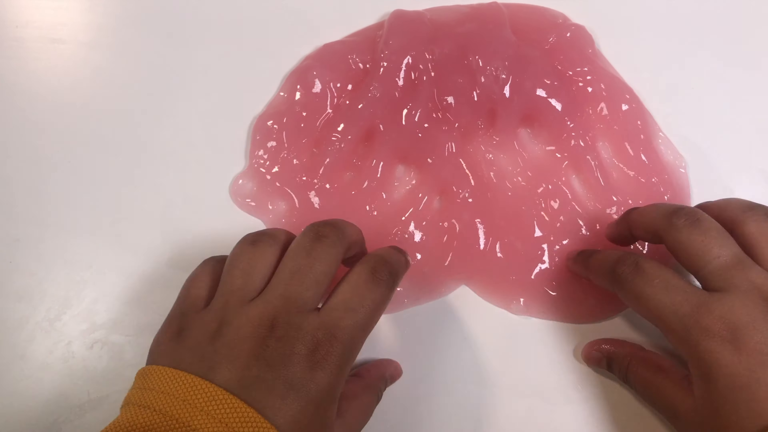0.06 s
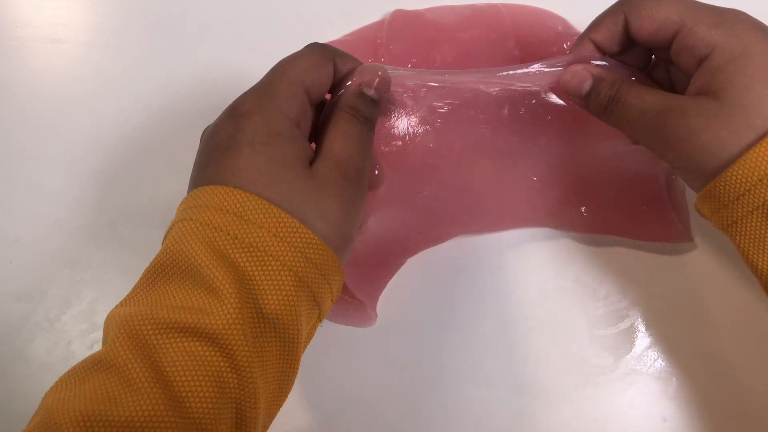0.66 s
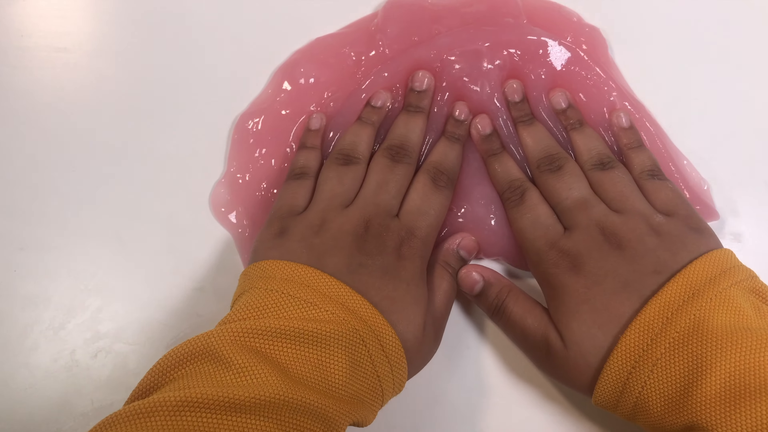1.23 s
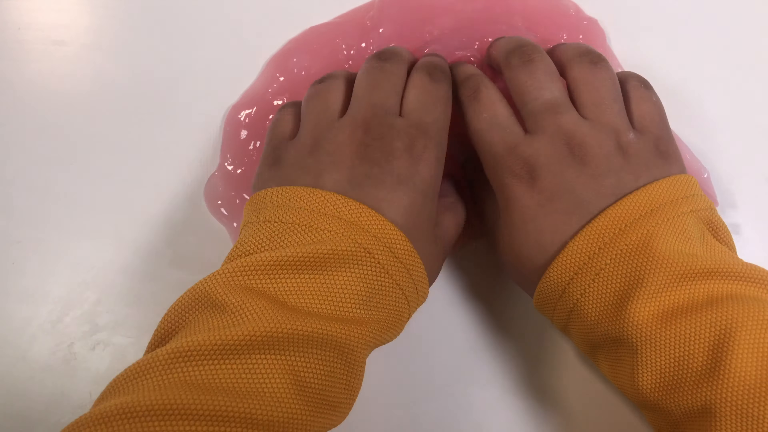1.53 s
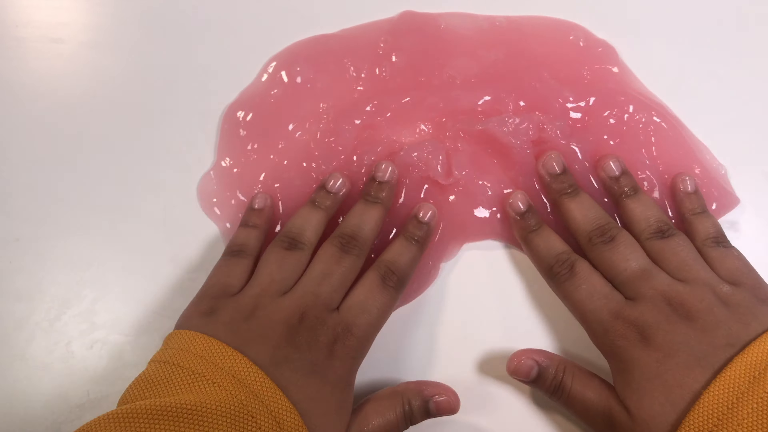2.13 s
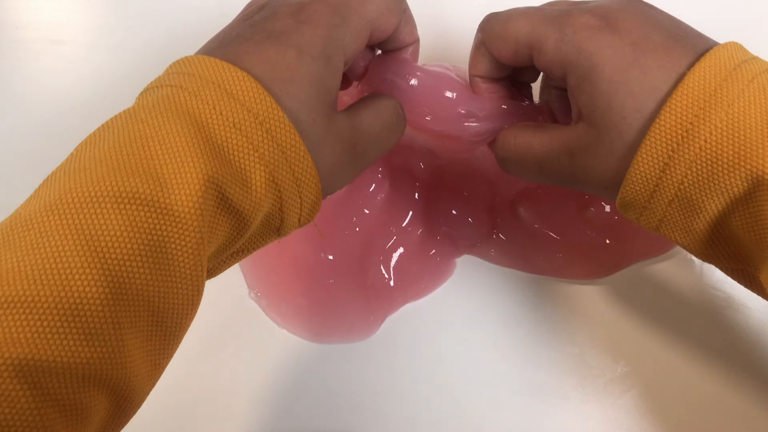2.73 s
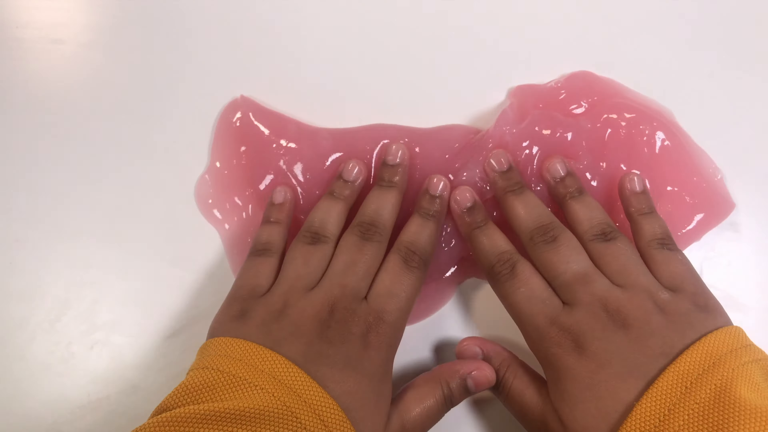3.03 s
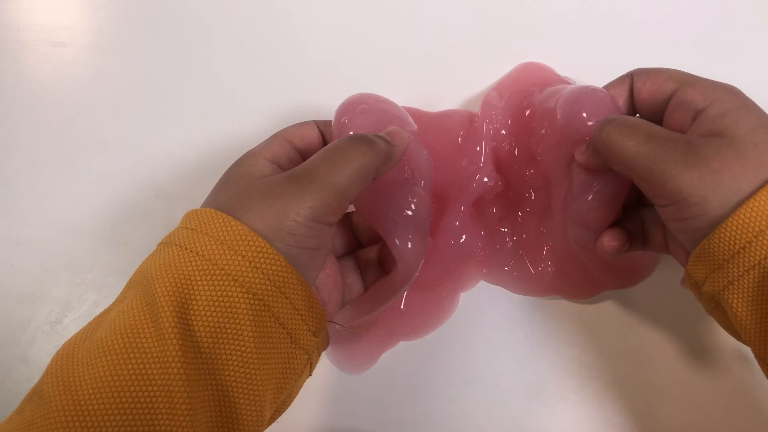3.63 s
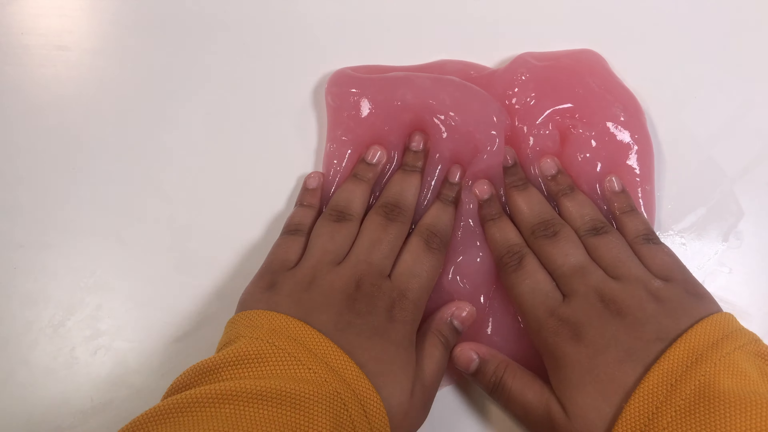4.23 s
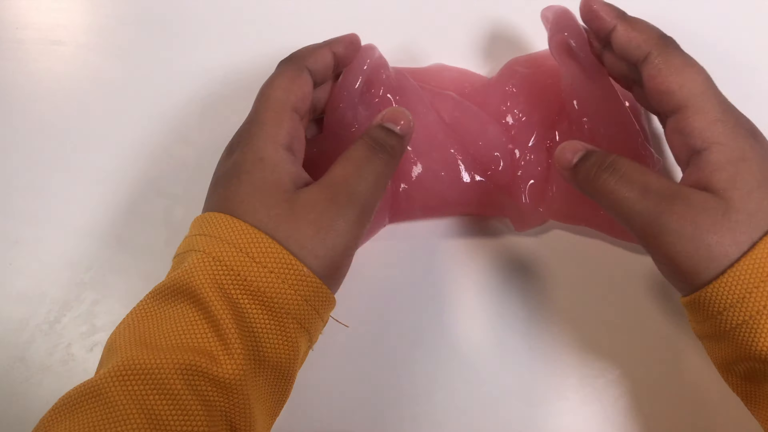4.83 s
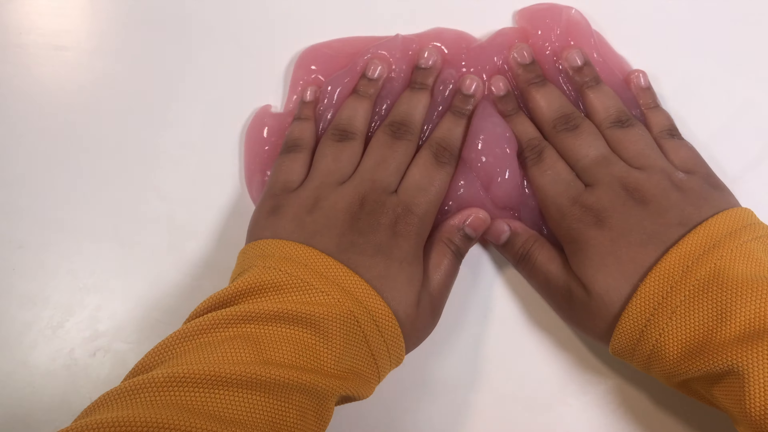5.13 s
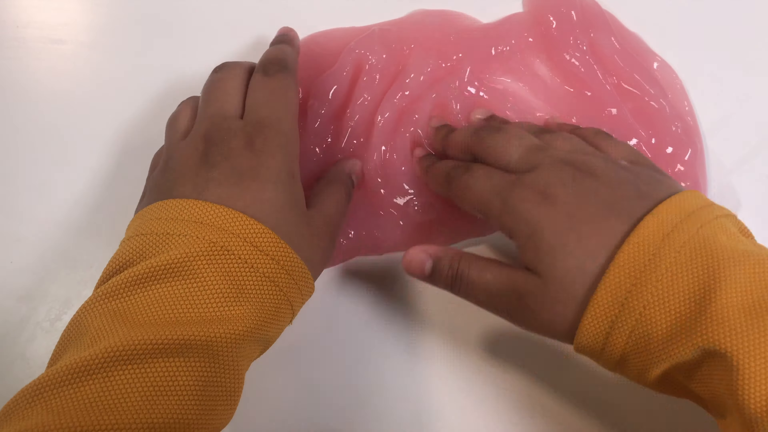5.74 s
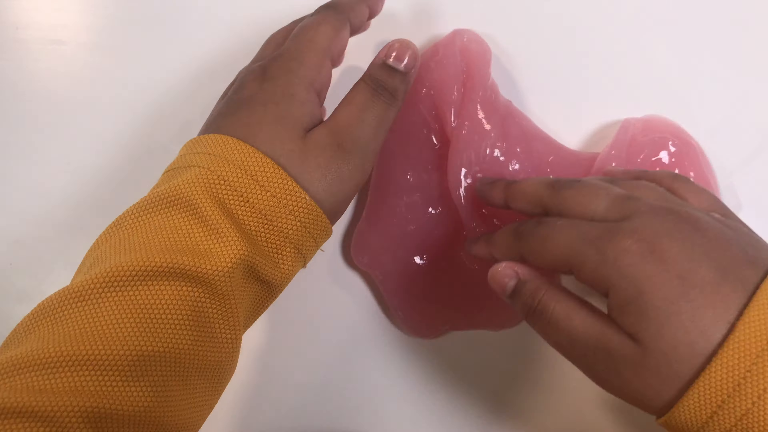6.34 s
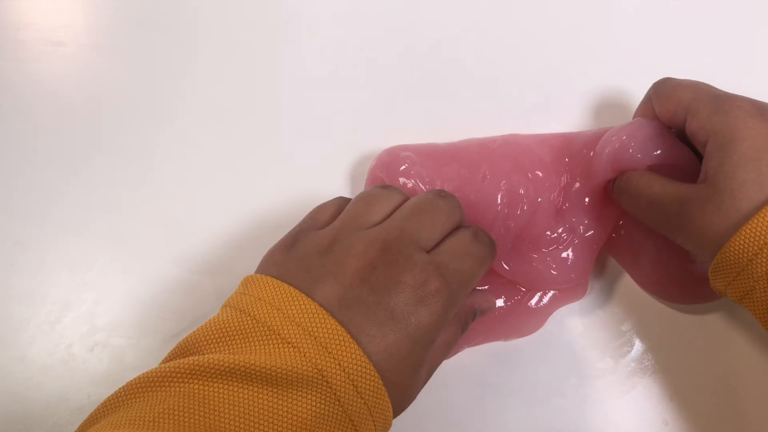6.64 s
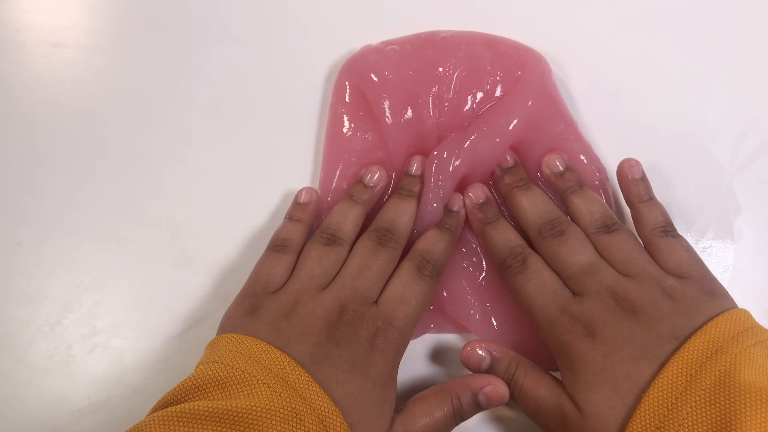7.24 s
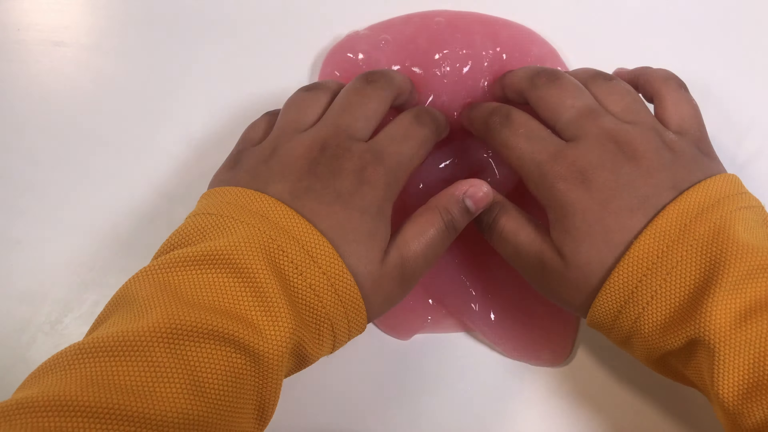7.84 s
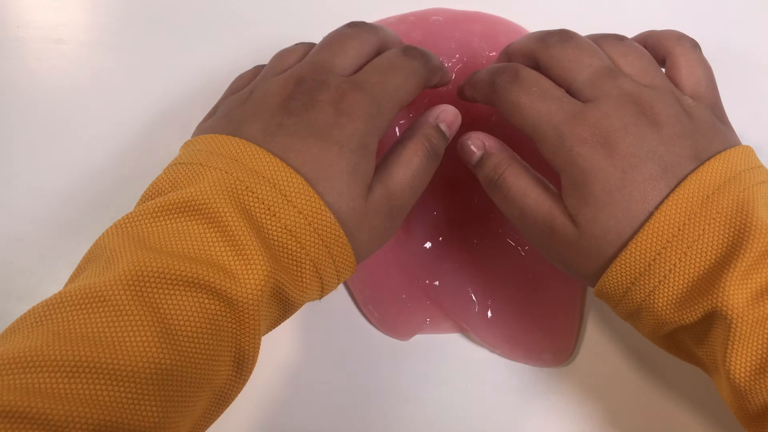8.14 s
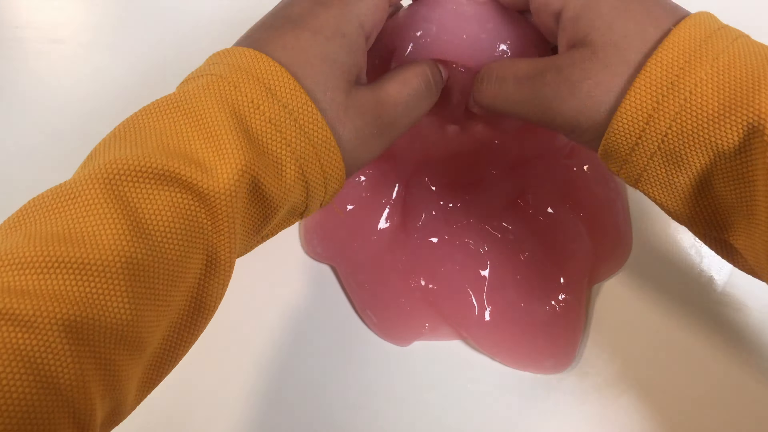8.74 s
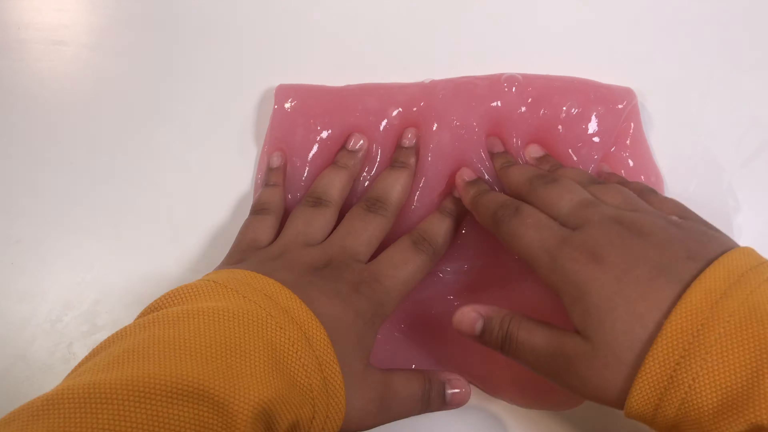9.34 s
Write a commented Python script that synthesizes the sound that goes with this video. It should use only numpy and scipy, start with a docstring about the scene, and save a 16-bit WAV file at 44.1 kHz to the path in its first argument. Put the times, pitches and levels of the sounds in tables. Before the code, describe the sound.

Two hands knead sticky slime on a table, close to the microphone in a small, quiet room; everything sounds slightly hollow. A soft pop and plop come at 0.2 seconds. From about 0.9 seconds the palms press, bringing faint rubbing, fizz, sticky crackle and small bubble ticks, with light pops until 2.2 seconds. Each big air pocket bursts with a quick double pop, a snap and a gulp, leaving a soft low thump. A loud one lands at 2.7 seconds, followed by more pops and stronger squelching around 3.3 to 4.3 seconds. Faint, brief squeaks and soft plops appear here and there, and some pops ring briefly. Another loud pop comes at 5.1 seconds. From 5.7 seconds, sharp pops recur roughly every third to half second, each with a short crackle; the loudest, near 8 seconds, distorts slightly. The sound stops at about 9.3 seconds.

```python
"""A small room, where two hands knead sticky slime on a table, close to a microphone.
Each big air pocket is gripped, bursts twice with a pop, a snap and a gulp, and leaves a soft low thump:
the tearing film excites the cavity, and the slab lands on the table. Small bubbles tick, open cavities
ring, soft pockets plop and creases squeak. Under the palms the slime rubs, squelches, fizzes and crackles
as it peels off the skin. Interference makes it all hollow, and the loudest pops overload the recorder."""
import sys
import numpy as np
from scipy import signal
from scipy.fft import rfft, irfft, next_fast_len
from scipy.io import wavfile
from scipy.ndimage import uniform_filter1d

SR = 44100
rng = np.random.default_rng(int(sys.argv[2]) if len(sys.argv) > 2 else 0)


def to_wav(s):
    """Save 16-bit WAV."""
    ch = np.atleast_2d(s).T  # columns
    pcm = np.round(np.clip(ch, -1, 1) * 32767)  # PCM
    wavfile.write(sys.argv[1], SR, pcm.astype(np.int16))


N = 418068

# Resonances of the pops and the crackle. Each row: frequency in Hz, bandwidth in Hz, gain in dB.
POP_MODES = [(1650, 130, -4), (1960, 170, 0), (2330, 160, -5), (3470, 230, -2), (4550, 130, -6),
             (5200, 380, -5), (7470, 190, -7), (9560, 190, -3), (11500, 900, -6)]
# Hollow resonances of the gulps. Each row: frequency in Hz, bandwidth in Hz, gain in dB.
GULP_MODES = [(298, 6.7, -4), (379.2, 38, 6.5), (443.5, 68, 2), (569, 74, 2), (653, 27, 0), (872, 33, -4)]
# Low resonances of table and room. Each row: frequency in Hz, bandwidth in Hz, gain in dB.
TABLE_MODES = [(98, 16, 6), (148, 14, 3), (173, 22, 2)]
# Big air pockets, which burst again as they collapse. Each row: start in seconds, gap to the second burst
# in seconds, pop level in dB, pop pitch in Hz, snap level in dB, gulp level in dB, second burst against
# the first in dB, thump level in dB. Levels in all tables are relative.
BIG_POCKETS = [(0.208, 0.029, -17.5, 1960, -15, -28, 2.5, -26.5),
               (0.9325, 0.0046, -20.5, 1590, -19, -20, -3.5, -21.5),
               (1.3085, 0.0059, -23.5, 2300, -31, -22, -7, -20.5),
               (1.6141, 0.004, -23.5, 2100, -26, -26.5, -7, -18.5),
               (1.7659, 0.034, -16.5, 2440, -19, -19.5, -1.5, -14),
               (2.1928, 0.005, -21.5, 1600, -25, -20.5, -12, -25.5),
               (2.72, 0.016, -5, 3250, -15, -10.5, -10.5, -7.5),
               (3.334, 0.0061, -12, 1680, -12.5, -13.5, -7, -18),
               (3.593, 0.0037, -13, 2600, -22, -24.5, 2.5, -12),
               (3.805, 0.0025, -23, 2470, -22, -24.5, -3, -10),
               (4.255, 0.0028, -17.5, 1310, -31.5, -16.5, -13, -33),
               (4.3343, 0.0037, -17.5, 5000, -23, -30.5, -27, -19.5),
               (4.717, 0.018, -22.5, 3050, -29.5, -26.5, 12.5, -10.5),
               (5.087, 0.025, -2, 2570, -11, -14.5, 5.5, -13.5),
               (5.137, 0.018, -17.5, 3500, -8.5, -36, 0, -36),
               (5.666, 0.0058, -10, 1520, -16.5, -6.5, -13, -15.5),
               (5.963, 0.013, -12.5, 2090, -7, -13.5, -2, -12.5),
               (6.4129, .025, -6, 2190, -4.5, -14, -7, -14), (6.871, 0.026, -14, 2430, -9.5, -14, -8, -17),
               (7.349, 0.023, -7, 3100, -3.5, -15, -8.5, -14.5),
               (7.6935, 0.014, -6, 2420, -12.5, -12, 3, -11.5), (8.0304, 0.022, 0.5, 3150, 3, -8, -9.5, -7),
               (8.3863, 0.02, -5, 3160, -12.5, -15.5, 4, -9), (8.7427, 0.023, -5, 2420, -5, -19, 0.5, -12),
               (9.09, 0.023, -11, 2620, -8.5, -24, 6, -14.5)]

ATTACK_S, RELEASE_S = 0.029, 0.02  # attack of a press; release of any push
CONTACT_S = .84  # the sheet of slime is laid down and the kneading begins
RIP_DB = -37  # below this tack the rips die out and leave a smooth rub
TOP_HZ = 15700


def undb(db):
    """Amplitude ratio of a level in decibels."""
    return 10 ** (np.asarray(db) / 20)


def unit(x):
    """Normalisation to an rms of 1."""
    return x / np.sqrt(np.mean(x ** 2) + 1e-18)


def add(out, s, x):
    """Superposition: x joins out from s seconds on."""
    i = max(0, int(s * SR))
    out[i:i + len(x)] += x[:len(out) - i]


def band(x, lo_hz, hi_hz, order=2):
    """Causal Butterworth band-pass filtering."""
    sos = signal.butter(order, [lo_hz, min(hi_hz, .48 * SR)], "band", fs=SR, output="sos")
    return signal.sosfilt(sos, x)


def resonance(f, hz, width):
    """Frequency response of a damped oscillator, with gain 1 at its centre."""
    return 1j * f * width / (hz ** 2 - f ** 2 + 1j * f * width)


def colour(x, modes, direct_db):
    """Modal filtering: parallel resonances add to a direct path."""
    size = next_fast_len(x.shape[-1])
    f = np.arange(size // 2 + 1) * SR / size
    response = undb(direct_db) + sum(undb(db) * resonance(f, hz, width) for hz, width, db in modes)
    return irfft(rfft(x, size) * response, size)[..., :x.shape[-1]]


def disperse(x, lag_s):
    """Dispersion: the lows come last, so a burst falls in pitch; lag_s is the delay near 500 Hz."""
    f = np.fft.rfftfreq(x.shape[-1], 1 / SR)
    turns = lag_s * 500 * np.log(1 + f / 40)
    return irfft(rfft(x) * np.exp(-2j * np.pi * turns), x.shape[-1])


def swell(db, step_s):
    """Random amplitude modulation: the gain wanders by about db, to a new level every step_s."""
    knots = np.arange(0, N / SR + 1, step_s)
    levels = np.clip(rng.standard_normal(N)[:len(knots)], -2, 1)
    return undb(db * np.interp(np.arange(N) / SR, knots, levels))


def clicks(rate, spread_db):
    """A Poisson process of ruptures, mostly small and a few large."""
    sizes = undb(spread_db * np.minimum(rng.exponential(size=N), 3))
    return (rng.random(N) < rate / SR) * sizes * rng.choice([-1, 1], N)


def blips(rate, hz, octaves, cycles, spread_db):
    """Free decay of tiny pockets: each rings for a few cycles at its own natural frequency."""
    t, out = np.arange(SR // 25) / SR, np.zeros(N)
    for when, pitch, size in rng.random((int(rate * N / SR), 3)):
        turns = t * hz * 2 ** (octaves * (2 * pitch - 1))
        ring = np.exp(-turns / cycles) * np.sin(2 * np.pi * turns)
        add(out, when * N / SR, undb(spread_db * size ** 3) * ring)
    return out


def room_noise(level_db=-62.5):
    """Stationary noise: the faint, mostly low background of the room."""
    # Spectrum of the quiet room. Each row: frequency in Hz, relative spectral density in dB.
    density = [(30, -21), (120, 6), (300, -13), (15000, -46.5)]
    hz, db = np.transpose(density)
    f = np.maximum(np.arange(N // 2 + 1) * SR / N, 1)
    gain = undb(np.interp(np.log(f), np.log(hz), db))
    return undb(level_db) * unit(irfft(rfft(rng.standard_normal(N)) * gain, N))


def reverberation(x):
    """Dense reflections from table and walls decay exponentially; the middle lingers faintly."""
    t = np.arange(int(.7 * SR)) / SR
    def tail(lo_hz, hi_hz, t60, db):
        """One band of the impulse response, falling 60 dB in t60 seconds."""
        decay = rng.standard_normal(len(t)) * np.exp(-np.log(1000) * t / t60) * (1 - np.exp(-t / 0.0013))
        return undb(db) * band(decay / np.linalg.norm(decay), lo_hz, hi_hz)
    response = (tail(85, 175, t60=0.26, db=-12) + tail(110, 700, t60=0.24, db=-9)
                + tail(670, 5800, t60=0.17, db=-9.5) + tail(8000, TOP_HZ, t60=0.17, db=-9.0)
                + tail(1500, 7400, t60=0.61, db=-25))
    return x + signal.fftconvolve(x, response)[:N]


def interference(x):
    """Destructive interference: some pitches cancel on the way to the microphone, which sounds hollow."""
    # Cancelled bands. Each row: frequency in Hz, bandwidth in Hz.
    notches = [(1015, 76), (2860, 420), (3820, 47), (6300, 160)]
    f, spectrum = np.fft.rfftfreq(N, 1 / SR), rfft(x)
    for hz, width in notches:
        spectrum = spectrum * (1 - resonance(f, hz, width))
    return irfft(spectrum, N)


def push(age, attack, hold, sag_db_per_s):
    """Amplitude envelope of one push: linear attack, sagging hold, exponential release."""
    shape = np.clip(1 + age / attack, 0, 1) * np.exp(-np.clip((age - hold) / RELEASE_S, 0, 20))
    return shape * undb(-sag_db_per_s * np.clip(age, 0, hold))


def hands(grip_lead_s=0.018, grip_attack_s=0.047, grip_hold_s=0.36, grip_sag_db_per_s=77.5):
    """Driving envelopes: the strongest push sets the tack (for crackle) and the squeeze (for squelch)."""
    # The palms press and peel off. Each row: start in seconds, hold in seconds, tack in dB, squeeze in dB.
    presses = [(0.864, 0.13, -28.5, -39.5), (1.027, 0.31, -34.5, -40.5), (1.387, 0.46, -34, -36.5),
               (1.932, 0.082, -38, -36), (2.11, 0.29, -37.5, -52), (2.369, .16, -33, -33),
               (2.659, 0.079, -28, -35), (2.896, 0.13, -37.5, -35.5), (3.115, 0.06, -51.5, -32),
               (3.319, 0.2, -37.5, -32.5), (3.774, 0.11, -25, -25.5), (3.982, .05, -30.5, -26),
               (4.119, .37, -33, -49), (4.696, 0.13, -31.5, -37.5), (4.909, 0.12, -37.5, -51),
               (5.157, 0.096, -25, -33.5), (5.459, 0.047, -35.5, -25), (5.519, 0.16, -37, -66)]
    pushes = [(s, ATTACK_S, hold, 0, tack_db, squeeze_db) for s, hold, tack_db, squeeze_db in presses]
    # the fingers grip a big pocket just before it bursts, harder for a louder pop, then relax
    for s, _, pop_db, *_ in BIG_POCKETS:
        if s > CONTACT_S:
            tack_db, squeeze_db = -27.5 + 0.48 * pop_db, -40.5 + 0.48 * pop_db
            pushes.append((s - grip_lead_s, grip_attack_s, grip_hold_s, grip_sag_db_per_s,
                           tack_db, squeeze_db))
    start, attack, hold, sag, tack_db, squeeze_db = np.transpose(pushes)[:, :, None]
    t = np.arange(0, N / SR, .001)
    shapes = push(t - start, attack, hold, sag)
    strongest = [np.max(undb(db) * shapes, axis=0) for db in (tack_db, squeeze_db)]
    return [np.interp(np.arange(N) / SR, t, gain) for gain in strongest]


def rubbing(low_db=-48, hollow_db=-55, smear_db=-61, stretch_db=-11, lift_s=0.57):
    """Friction noise: slime smears on skin and table, faintly while stretched and not while lifted."""
    t = np.arange(N) / SR
    noise = colour(rng.standard_normal(N), TABLE_MODES + GULP_MODES + POP_MODES, direct_db=1.5)
    rub = (undb(low_db) * unit(band(noise, 79, 175)) + undb(hollow_db) * unit(band(noise, 350, 610))
           + undb(smear_db) * unit(band(noise, 1900, 2000, order=1)))
    stretched = undb(stretch_db) * push(t, ATTACK_S, lift_s, 0)
    laid_down = np.clip((t - CONTACT_S) / ATTACK_S, 0, 1)
    return rub * (stretched + laid_down)


def sizzling(tack, sizzle_db=-10):
    """Bubble resonance: swarms of tiny bubbles ring high on the surface, in uneven spurts."""
    swarm = blips(rate=1200, hz=11700, octaves=.22, cycles=20, spread_db=14)
    spurts = swell(db=5, step_s=0.025)
    pull = np.minimum(tack / undb(RIP_DB), 1)
    return undb(sizzle_db) * tack * pull * unit(spurts * swarm)


def squelching(squeeze, tack, gurgle_db=-1, rumble_db=-1):
    """Forced vibration: pockets gurgle under the palms, and the slab drives the table to a low rumble."""
    pockets = blips(rate=130, hz=400, octaves=.6, cycles=2.2, spread_db=13)
    gurgle = unit(band(colour(pockets, GULP_MODES, direct_db=-1.5), 270, 860, order=3))
    table = colour(clicks(rate=160, spread_db=0), TABLE_MODES, direct_db=-10)
    rumble = unit(band(table, 105, 172.6, order=3))
    effort = np.sqrt(squeeze * tack)
    return undb(gurgle_db) * squeeze * gurgle + undb(rumble_db) * effort * rumble


def peeling(tack, crackle_db=-10, wet_db=-7, fizz_db=-12, rip_s=0.0021):
    """Adhesive failure: slime leaves the skin in short rips of crackle, tiny wet pops and fizz."""
    # The freshly laid sheet sizzles evenly; later it lets go in separate rips.
    # Each row: time in seconds, even share of the power from 0 to 1.
    evenness = [(1.301, 0.7), (1.601, 0.13)]
    even = np.clip(np.interp(np.arange(N) / SR, *np.transpose(evenness)), 0, 1)
    t = np.arange(SR // 20) / SR
    pull = np.minimum(tack / undb(RIP_DB), 1)  # it takes some pull to rip
    starts = abs(clicks(rate=100, spread_db=2.5)) * pull ** 2
    starts = starts * swell(db=1.5, step_s=.03)  # rips come in clusters
    def rips():
        """Envelope of the rips in one band; each rip favours other bands."""
        envelope = unit(signal.fftconvolve(starts * rng.random(N) ** 2, t * np.exp(-2 * t / rip_s))[:N])
        return np.sqrt(even + (1 - even) * envelope ** 2)
    grains = colour(clicks(rate=4000, spread_db=2.5), POP_MODES, direct_db=-13)
    crackle = unit(rips() * band(grains, 1200, 6000))
    wet = rips() * pull * blips(rate=1300, hz=2700, octaves=1, cycles=7, spread_db=14)
    wet = unit(band(colour(wet, POP_MODES, direct_db=-10), 1150, 7000))
    fizz = unit(rips() * band(grains, 7000, 10000) + rips() * band(grains, 10000, 13500))
    return tack * (undb(crackle_db) * crackle + undb(wet_db) * wet + undb(fizz_db) * fizz)


def squeaks(sweep_hz=5000, end_hz=350, fall_s=.0015):
    """Flow-induced vibration: escaping air buzzes a crease, and the pitch plunges as it widens."""
    # Creases squeezed empty. Each row: start in seconds, level in dB.
    creases = [(1.93, -29), (2.914, -23.5), (3.968, -21), (5.339, -22), (8.957, -19)]
    t, out = np.arange(SR // 10) / SR, np.zeros(N)
    harmonic = np.arange(1, 30)[:, None]
    pitch = end_hz + sweep_hz * np.exp(-t / fall_s)
    partials = np.sin(2 * np.pi * harmonic * np.cumsum(pitch) / SR) / harmonic ** .65
    buzz = np.sum((harmonic * pitch < TOP_HZ) * partials, axis=0)
    opening = t / (5.5 * fall_s)
    for s, db in creases:
        add(out, s, undb(db) * opening * np.exp(1 - opening) * buzz)
    return colour(out, POP_MODES + GULP_MODES, direct_db=-10.5)


def plops(swell_cycles=1.6, drop=0.1):
    """Heavily damped oscillation: a soft pocket swells and dies away, its pitch settling downward."""
    # Soft pockets that fold shut. Each row: start in seconds, final pitch in Hz, level in dB.
    soft_pockets = [(0.236, 343, -15.5), (3.11, 145.6, -21), (3.214, 364, -15.5), (3.841, 403, -9),
                    (4.063, 150, -20), (5.234, 400, -18), (5.401, 150.3, -20.5), (5.752, 146.7, -15.5),
                    (7.187, 162, -24.5), (7.899, 152.2, -15), (9.0, 146.5, -11.5)]
    t, out = np.arange(SR // 10) / SR, np.zeros(N)
    for s, hz, db in soft_pockets:
        age = t * hz / swell_cycles
        pitch = hz * (1 + drop * np.exp(-age))
        shape = (age * np.exp(1 - age)) ** 2
        add(out, s, undb(db) * shape * np.sin(2 * np.pi * np.cumsum(pitch) / SR))
    return out


def ringing_cavities(waver=0.085):
    """Cavity resonance: open pockets ring briefly, and their soft walls make the pitch waver."""
    # Cavities that stay open. Each row: start in seconds, pitch in Hz, level in dB, T60 in seconds.
    cavities = [(0.208, 663, -22, 0.17), (3.209, 1446, -4, 0.014), (3.594, 3353, 2, 0.12),
                (5.666, 366, -2, 0.08), (5.971, 1953, 0.5, 0.045), (6.19, 2055, -20, 0.031),
                (7.698, 767, -3, 0.1), (8.723, 794, -6, 0.049), (8.755, 2258, 5, 0.048),
                (9.107, 660, -2, 0.1)]
    t, out = np.arange(SR // 8) / SR, np.zeros(N)
    for s, hz, db, t60 in cavities:
        pitch = hz * (1 + waver * unit(uniform_filter1d(rng.standard_normal(len(t)), size=90)))
        shape = (1 - np.exp(-t / 0.00018)) * np.exp(-np.log(1000) * t / t60)
        add(out, s, undb(db) * shape * np.sin(2 * np.pi * np.cumsum(pitch) / SR))
    return out


def thumps(hz=136, rise_s=0.052, fall_s=0.015, drop=0.33, drop_s=0.0074, lag_s=0.02, trim_db=-1.5):
    """Impact excitation: the slab lands lag_s after each second burst and sets table and room booming."""
    age = np.arange(-int(.04 * SR), int(.14 * SR)) / SR
    shape = 2 / (np.exp(-age / rise_s * 2) + np.exp(age / fall_s)) * signal.windows.hann(len(age)) ** .5
    glide = 1 + drop * (np.exp(-np.maximum(age + drop_s, 0) / drop_s) - 1 / np.e)
    out = np.zeros(N)
    for (s, gap, *_, db), (phase, detune) in zip(BIG_POCKETS, rng.random((len(BIG_POCKETS), 2))):
        pitch = hz * (1 + .2 * (2 * detune - 1)) * glide
        swing = np.sin(2 * np.pi * (phase + np.cumsum(pitch) / SR))
        # the soft slab never wobbles the same way twice
        wobble = 0.37 * unit(band(rng.standard_normal(len(age)), 80, 230))
        add(out, s + gap + lag_s + age[0], undb(db + trim_db) * shape * (swing + wobble))
    return colour(out, TABLE_MODES, direct_db=-2.5)


def bursts(tick_width=0.29, pocket_width=0.99, tick_tear_s=0.0015, second_tear_s=0.0044):
    """Film ruptures: one per small bubble, two per big pocket; widths are bandwidth over pitch."""
    # Small bubbles that break with a single tick.
    # Each row: start in seconds, pop level in dB, pitch in Hz, snap level in dB.
    ticks = [(1.52, -18, 2380, -30), (1.69, -39, 1810, -52), (1.8152, -26, 5080, -32),
             (2.072, -34, 2400, -33), (2.259, -28.5, 5330, -31.5), (2.3678, -31.5, 2110, -27.5),
             (2.425, -37.5, 3490, -27.5), (2.443, -29.5, 2040, -18.5), (2.4577, -19, 2110, -33),
             (2.477, -24, 2020, -23.5), (2.4907, -27, 5080, -17), (2.665, -21, 2000, -31),
             (3.0355, -26.5, 1610, -24), (3.21, -25, 1790, -35.5), (3.418, -22.5, 2170, -34),
             (3.474, -30, 2070, -33.5), (4.1854, -27, 1900, -33), (4.308, -25, 2070, -28.5),
             (4.429, -29, 3400, -25), (4.4614, -29, 1250, -23.5), (4.5537, -27.5, 4120, -50.5),
             (5.052, -23, 1880, -50.5), (5.435, -19, 1450, -32.5), (5.4701, -26, 2150, -32.5),
             (5.4909, -18, 2520, -22.5), (5.5487, -20, 4400, -16), (5.5782, -34, 1900, -29),
             (5.769, -28.5, 1950, -57.5), (6.2137, -22.5, 2030, -33.5), (6.857, -25, 5600, -26),
             (7.579, -23.5, 2180, -39.5), (7.9183, -22, 2640, -30), (8.2747, -30, 5150, -36),
             (8.3673, -25.5, 4340, -19), (8.6257, -24.5, 2420, -31.5), (8.638, -27.5, 1850, -40.5),
             (8.6946, -33.5, 1940, -34), (9.072, -12, 1530, -34)]
    tick_gulp_db = -19  # against the pop
    rows = [(s, pop, hz, tick_width, snap, pop + tick_gulp_db, tick_tear_s) for s, pop, hz, snap in ticks]
    for s, gap, pop, hz, snap, gulp, second, _ in BIG_POCKETS:
        first_tear_s = 0.094 * gap  # time the film takes to give way
        rows.append((s, pop, hz, pocket_width, snap, gulp, first_tear_s))
        rows.append((s + gap, pop + second, hz, pocket_width, snap + second, gulp + second, second_tear_s))
    return rows


def tearing(age, rise_s, fall_s, grain_db):
    """Noise excitation: tiny ruptures build up as a film peels, until it gives way at age 0."""
    shape = np.exp(np.minimum(age / rise_s, -age / (fall_s + 0.79 * rise_s)))
    return shape * rng.standard_normal(shape.shape) * undb(grain_db * rng.exponential(size=shape.shape))


def pops(snap_trim_db=-1, gulp_trim_db=1):
    """Transient excitation: at each burst the cavity pops, the film snaps and the closing hole gulps."""
    size, lead_s = 4096, .02
    age, f = np.arange(size) / SR - lead_s, np.fft.rfftfreq(size, 1 / SR)
    s, pop_db, hz, width, snap_db, gulp_db, tear_s = np.transpose(bursts())[:, :, None]
    cavity = colour(tearing(age, tear_s, fall_s=.0012, grain_db=2.5), POP_MODES, direct_db=-11)
    cavity = irfft(rfft(cavity) * resonance(f, hz, width * hz))
    cavity = band(cavity, 1100, 6000, order=4)
    cavity = colour(cavity, [(1215, 220, 10), (4840, 840, 3.8)], direct_db=5.5)  # broad resonances
    film = colour(tearing(age, tear_s, fall_s=0.00046, grain_db=3.0), POP_MODES, direct_db=-15.5)
    film = band(film, 6200, 13800, order=3)
    hole = colour(tearing(age, tear_s, fall_s=0.0054, grain_db=3.5), GULP_MODES, direct_db=-11)
    hole = band(disperse(hole, lag_s=.002), 285, 880, order=4)
    out = np.zeros(N)
    for layer, db in ((cavity, pop_db), (film, snap_db + snap_trim_db), (hole, gulp_db + gulp_trim_db)):
        # levels are the energy of a burst spread over 10 ms
        rms = np.sqrt(np.sum(layer ** 2, axis=1, keepdims=True) / (.01 * SR))
        for start, burst in zip(s[:, 0], layer / rms * undb(db)):
            add(out, start - lead_s, burst)
    return out


def scene():
    """Superposition: all the slime sounds reach the microphone through the room, over its noise."""
    tack, squeeze = hands()
    kneading = peeling(tack) + squelching(squeeze, tack) + sizzling(tack) + rubbing()
    slime = pops() + thumps() + ringing_cavities() + plops() + squeaks() + kneading
    return (interference(reverberation(slime)) + room_noise())[None]


def record(dry):
    """Hard clipping flattens the loudest pops; a low-pass cuts the top, and the end falls silent."""
    silent_s, fade_s = 9.28, .01
    low_pass = signal.ellip(8, .2, 70, TOP_HZ, fs=SR, output="sos")
    gate = np.clip((silent_s - np.arange(N) / SR) / fade_s, 0, 1)
    return signal.sosfilt(low_pass, np.clip(dry, -1, 1) * gate)


dry = scene()
out = record(dry)
to_wav(out)
```